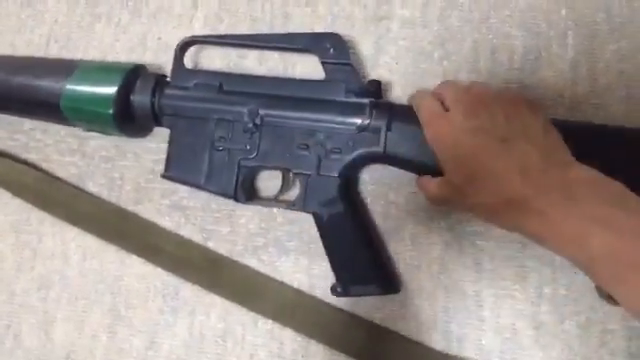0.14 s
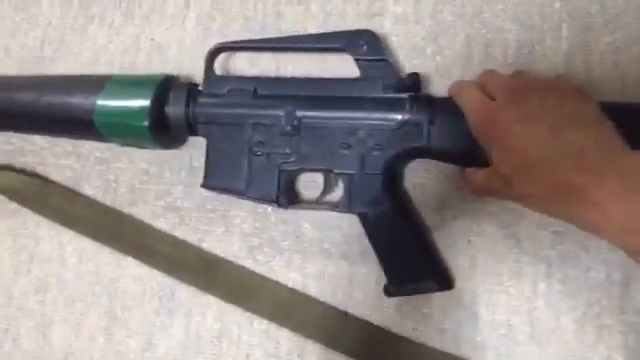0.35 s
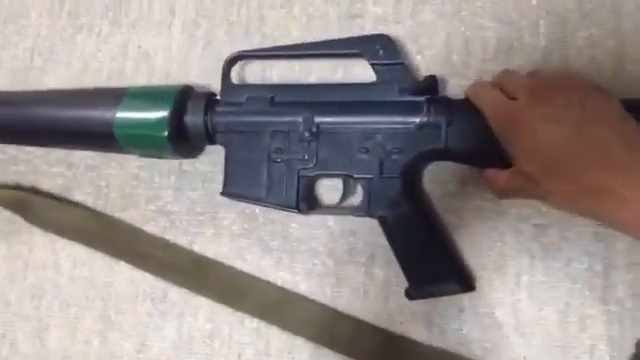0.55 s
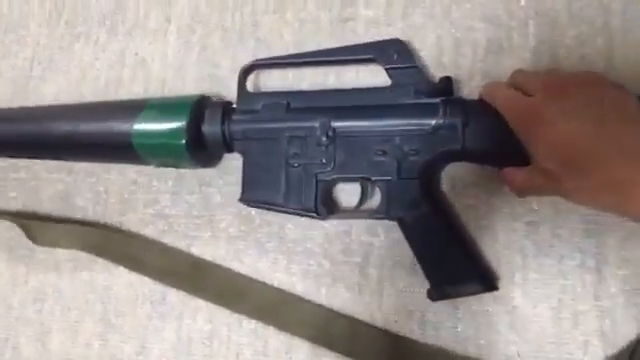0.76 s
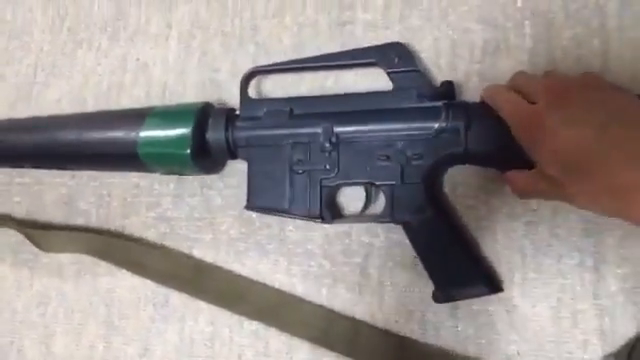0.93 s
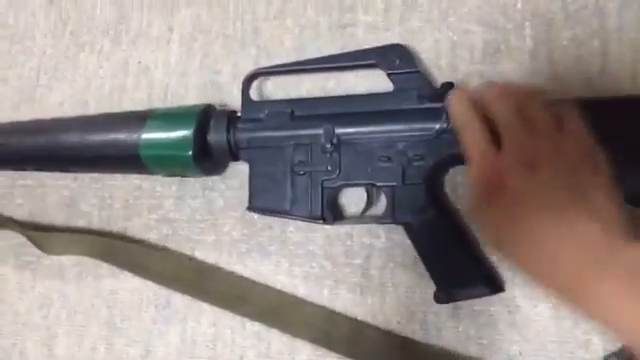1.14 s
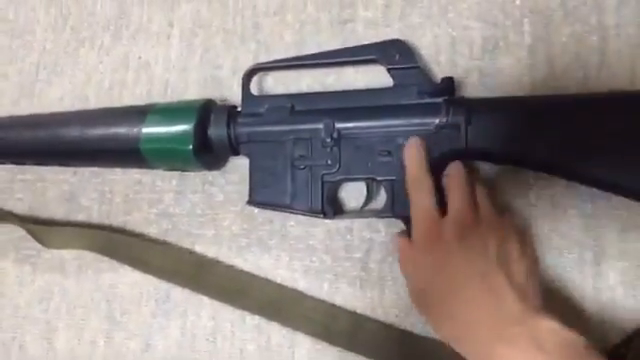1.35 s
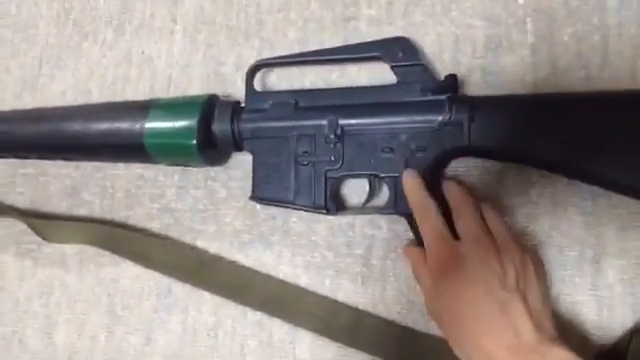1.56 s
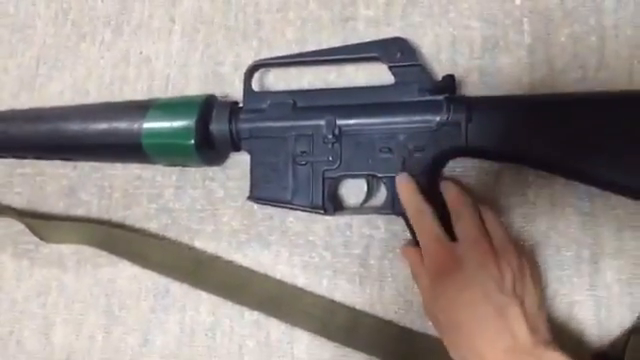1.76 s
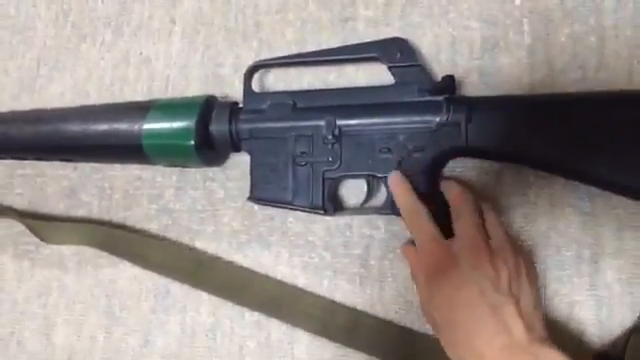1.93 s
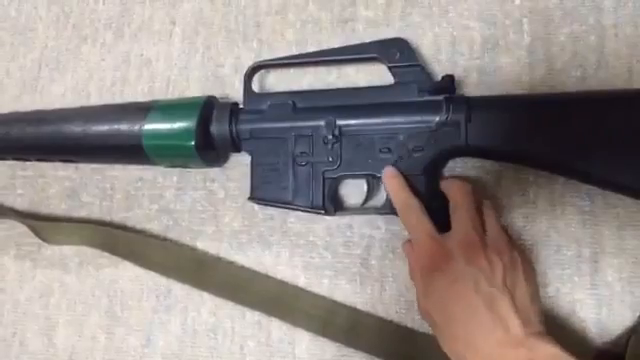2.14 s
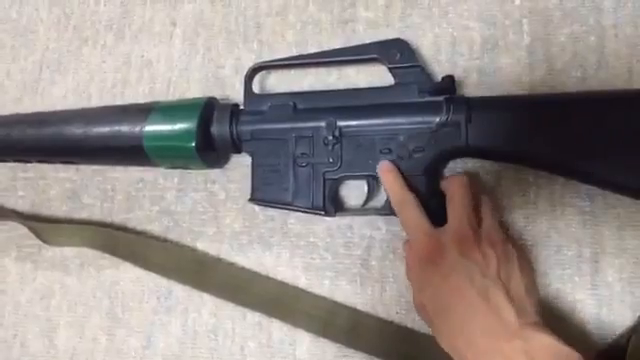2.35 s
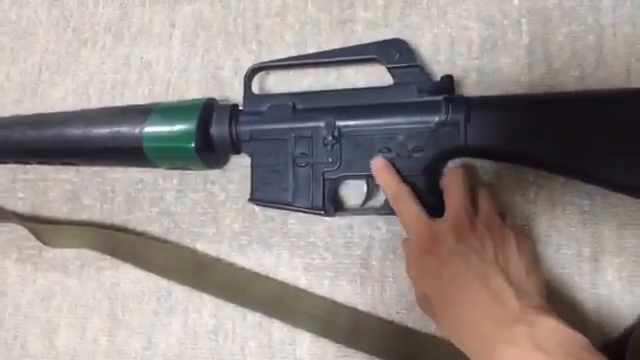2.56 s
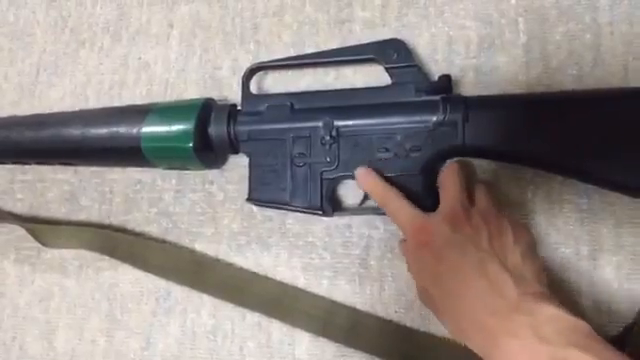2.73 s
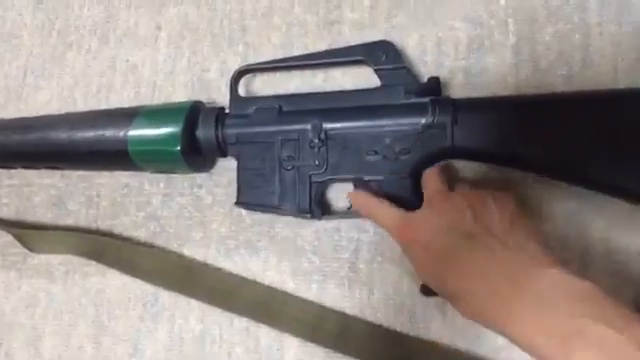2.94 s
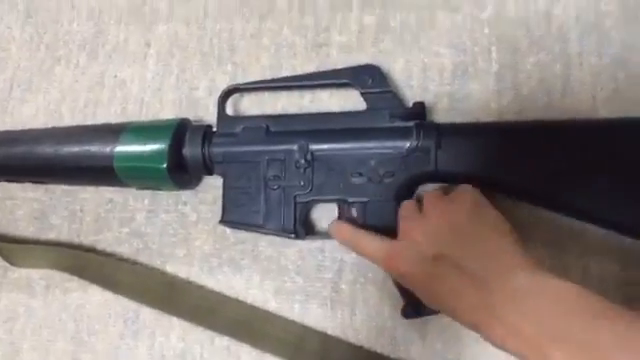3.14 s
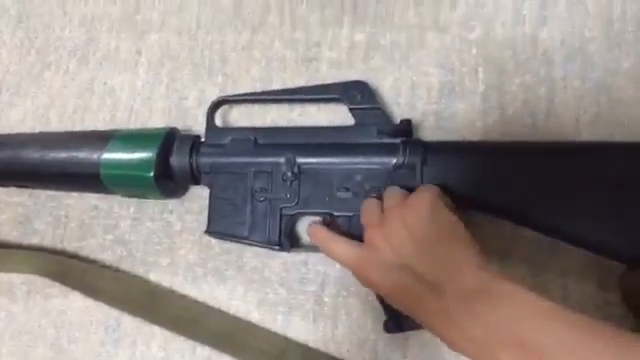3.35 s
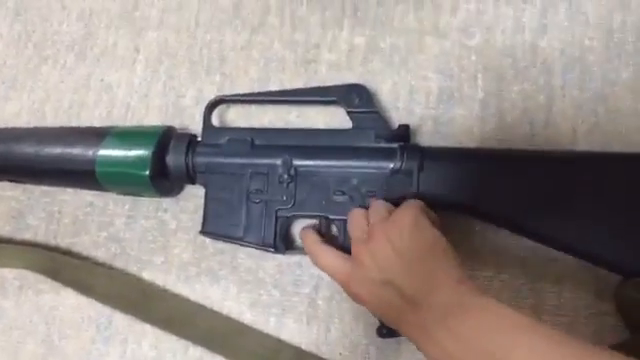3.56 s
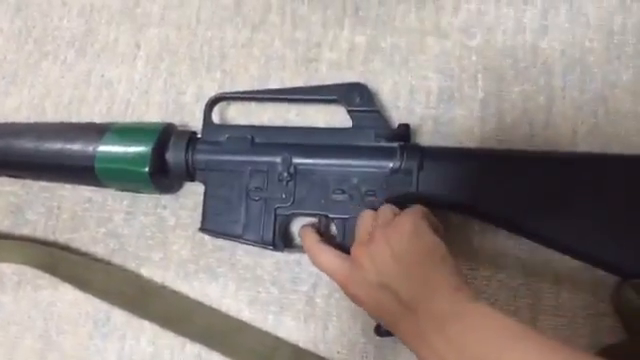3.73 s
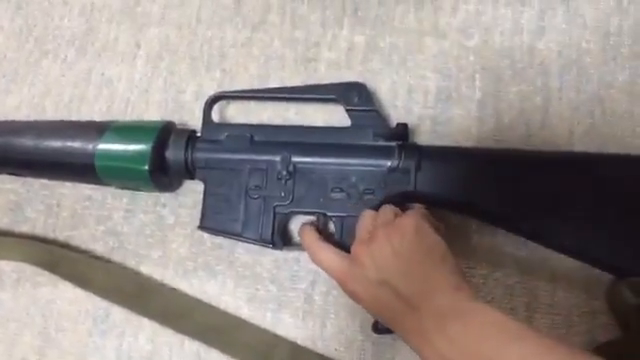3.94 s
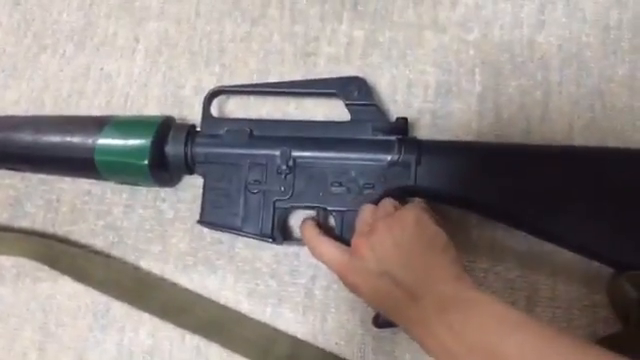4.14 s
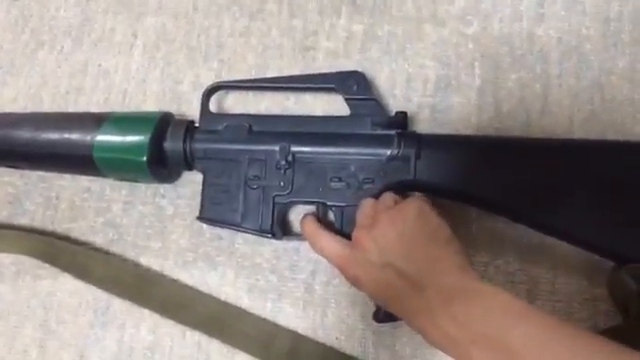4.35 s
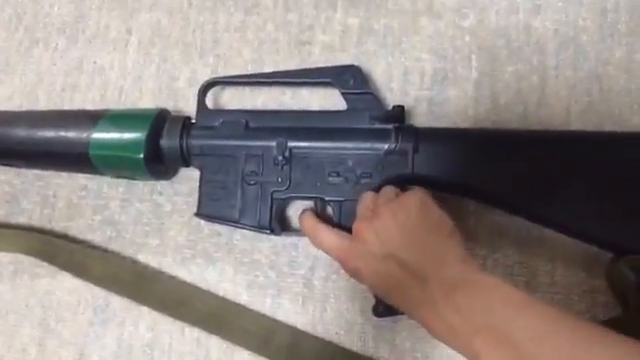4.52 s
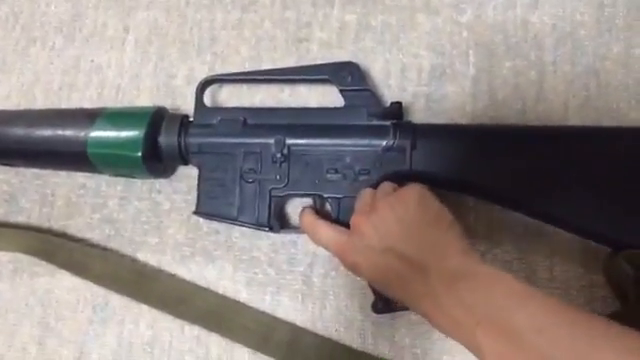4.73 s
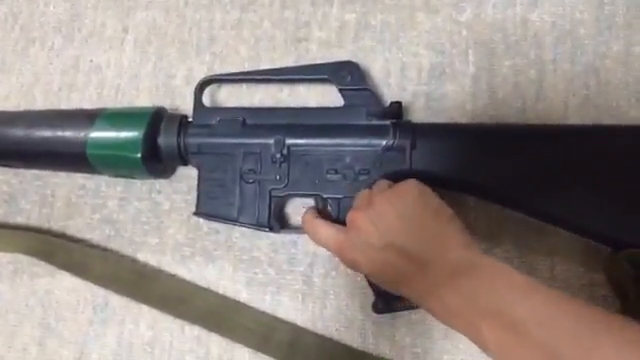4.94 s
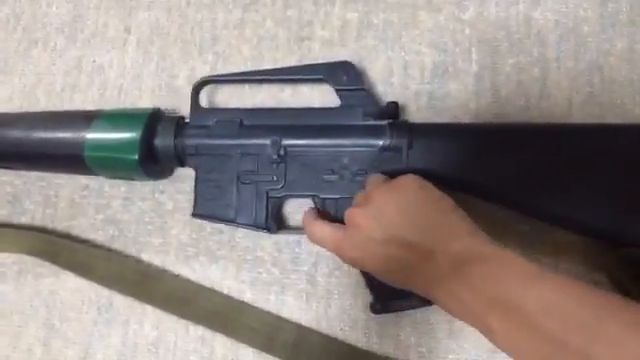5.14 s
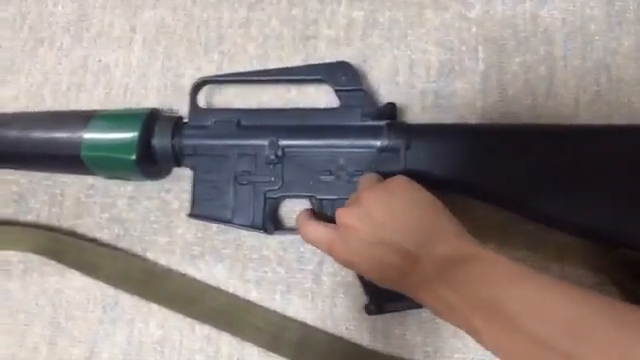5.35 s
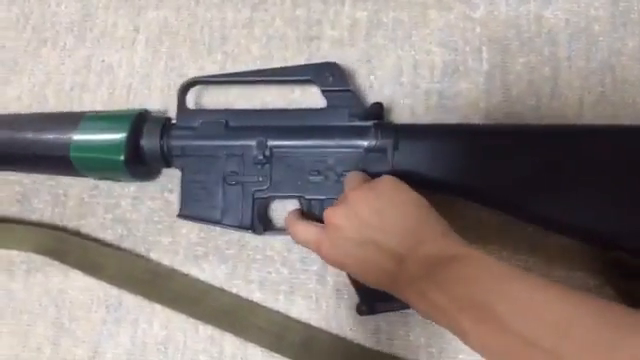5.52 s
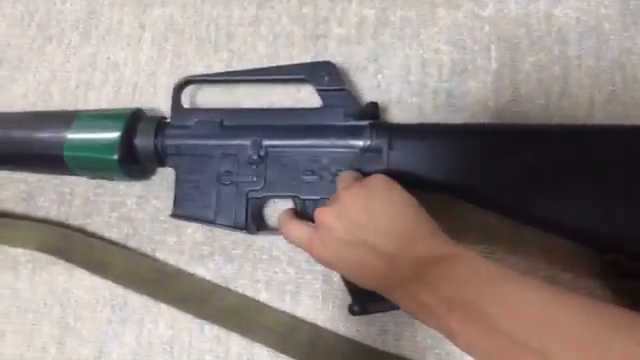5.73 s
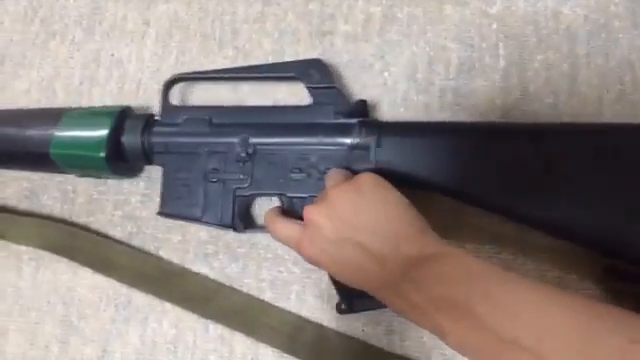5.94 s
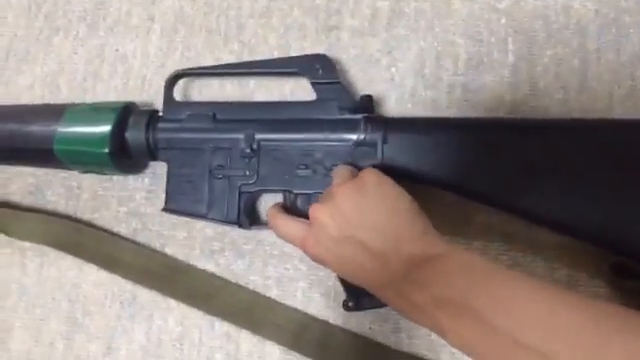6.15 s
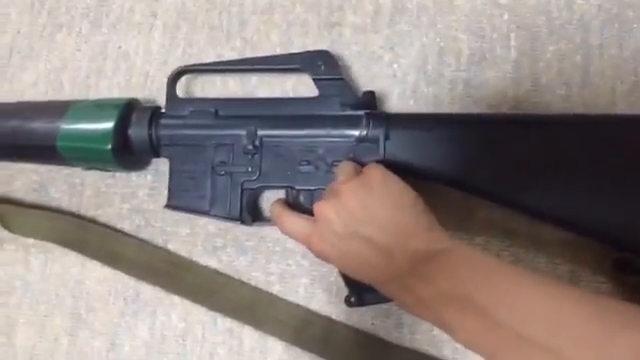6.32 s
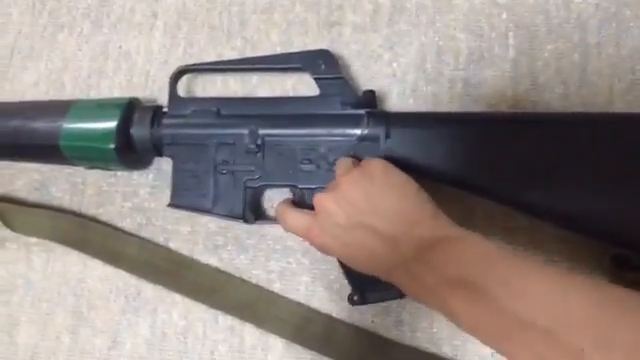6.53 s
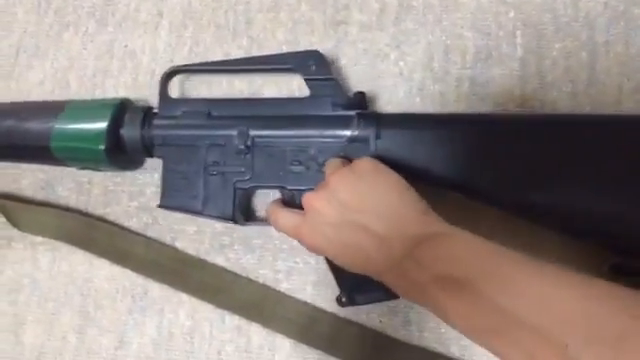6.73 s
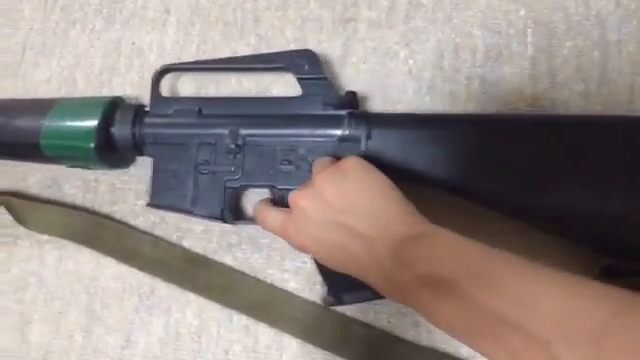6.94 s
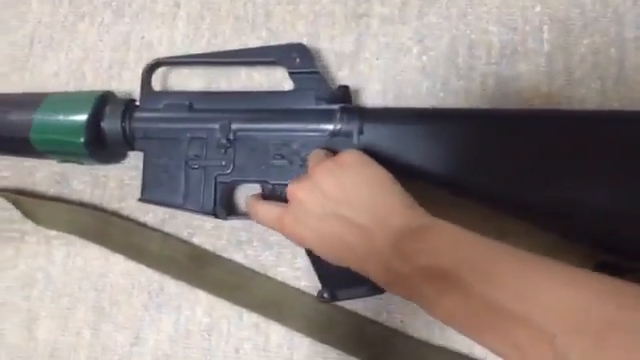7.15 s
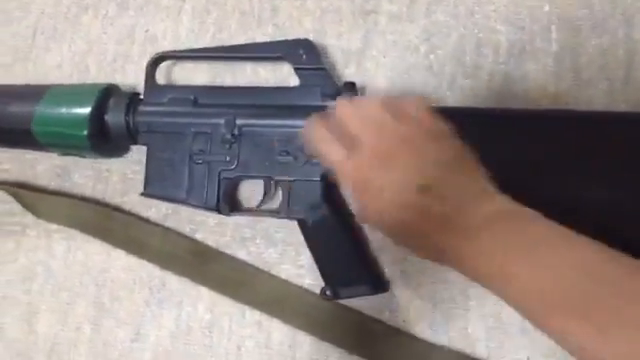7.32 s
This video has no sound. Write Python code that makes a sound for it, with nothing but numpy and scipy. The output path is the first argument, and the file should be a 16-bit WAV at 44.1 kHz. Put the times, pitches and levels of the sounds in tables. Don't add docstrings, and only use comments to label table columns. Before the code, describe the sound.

Soft carpet rustle and small plastic ticks, one sharp click, a long pause, then a whining electric toy gun hammers through two rapid bursts.

```python
import sys
import numpy as np
from scipy import signal
from scipy.fft import rfft, irfft
from scipy.io import wavfile
from scipy.ndimage import uniform_filter1d

SR = 44100
rng = np.random.default_rng(int(sys.argv[2]) if len(sys.argv) > 2 else 0)


def inscribe(sig):
    pcm = np.round(np.clip(np.atleast_2d(sig).T, -1, 1) * 32767)
    wavfile.write(sys.argv[1], SR, pcm.astype(np.int16))


def magnitude_from_level(level_db):
    exponent = np.asarray(level_db, float) / 20
    return 10 ** exponent


N = 329868
TIME = np.arange(N) / SR

# f/Hz, level/dB per Hz
HUSH_SPECTRUM = [(12, -63.5), (20, -8), (48, -3.5), (72, -1.5), (276, -13.5), (323, -11.5), (480, -19),
                 (576, -15), (730, -19.5), (1410, -22), (3090, -28.5), (7960, -31), (10600, -34),
                 (13800, -54), (22000, -120)]
HUSH_DB = -65
# f/Hz, level/dB
HUM_TONES = [(538.3, -84), (586.8, -74)]
ROOM_T60_S, ROOM_DB = 0.19, -12.5

# t/s, speed level/dB, weight level/dB
DRAG_MOTION = [
    [(.07, -72.5, -90), (.164, -59, -60), (.306, -54, -39.5), (.464, -56.5, -47), (.5, -59, -55),
     (.628, -61, -57.5), (.7, -58.5, -51.5), (.814, -59.5, -58), (1.008, -82.5, -77)],
]
# t/s, length/s, shell level/dB, pile level/dB, floor level/dB
GRIP_SHIFTS = [(.01, 0.11, -65.5, -74, -56), (1.042, 0.11, -60, -74, -60.5),
               (1.288, 0.032, -64.5, -77, -60), (1.37, 0.28, -69.5, -71, -75), (1.522, 0.13, -73, -73, -70),
               (1.68, 0.063, -86, -85, -62), (2.658, .25, -82, -83, -63), (2.88, 0.33, -74, -85, -73),
               (3.256, .18, -73, -79, -79), (3.423, 0.065, -88, -86, -63), (6.265, .5, -70.5, -87, -91),
               (6.37, .6, -69, -78.5, -89), (6.527, 0.19, -66, -74, -75)]
SHIFT_RISE_S, SHIFT_SWING_DB = 0.064, 20.5
# f/Hz, level/dB per Hz
RUSTLE_SPECTRUM = [(180, -35.5), (300, -9), (550, -12), (680, -0.5), (1030, -4), (1240, 0), (3000, -11.5),
                   (3900, -45), (6600, -120)]
# f/Hz, level/dB per Hz
PILE_SPECTRUM = [(1760, -18.5), (3000, -3), (4210, -3.5), (4810, 0), (5690, -3), (9510, -6.5), (10600, -16),
                 (13800, -44), (22000, -120)]
PILE_BELOW_DB = 3.5
# f/Hz, level/dB per Hz
RUMBLE_SPECTRUM = [(12, -50), (20, -36.5), (65, 1.5), (102, -9), (172, -9.5), (274, -44), (300, -55.5),
                   (390, -64), (660, -120)]

PART_VOICES = {"shell": [(1250, 1300, 0.018, 2)], "creak": [(1250, 1300, 0.24, -4)],
               "butt": [(210, 210, 0.058, 6.5)], "grip": [(460, 610, 0.062, -0.5)],
               "nail": [(6600, 2800, 0.011, 2)], "seam": [(3000, 3000, .02, -0.5)],
               "detent out": [(6510, 3700, 0.011, 1), (2150, 630, .03, -25.5), (450, 400, .02, -36),
               (5500, 1200, 0.041, -16)], "detent in": [(5100, 2300, 0.011, -5), (3300, 1400, 0.024, -7.5),
               (8470, 3200, 0.013, -7.5), (2150, 1100, 0.013, -11.5), (5000, 7000, 0.12, -14.5)],
               "trigger": [(1337, 700, .035, -1), (2600, 1600, .04, -5.5)],
               "contact": [(5010, 11000, 0.0076, 2)], "pinion": [(3700, 250, 0.043, 0.5)],
               "latch": [(4890, 230, 0.032, -0.5)], "floor": [(60.3, 63, 0.088, -3.5)],
               "scrape": [(5140, 800, .12, 0)], "rub": [(1350, 180, 0.36, 1)],
               "squeak": [(1860, 600, .18, 0)], "brush": [(2610, 700, 0.019, -0.5)],
               "stock": [(750, 1240, 0.028, 0.5)]}
FINGER_TICKS = {"shell": [(.981, -52.5), (1.018, -49), (1.114, -48), (3.394, -55), (4.931, -53),
                (7.425, -49)], "creak": [(1.026, -48), (1.105, -47)], "rub": [(.03, -54)],
                "squeak": [(3.24, -59)], "butt": [(.045, -50.5), (3.17, -60), (3.41, -63)],
                "stock": [(1.043, -39.5)], "grip": [(1.087, -46.5), (3.395, -50), (3.45, -63)],
                "seam": [(1.045, -45), (1.122, -58), (1.274, -54), (1.4195, -54), (2.987, -61),
                (6.561, -52.5)], "nail": [(1.034, -54), (1.046, -48), (1.261, -56), (1.335, -53),
                (1.42, -63), (6.529, -70), (7.425, -55)], "scrape": [(1.095, -58), (1.125, -60)]}
WORKS_TICKS = {"nail": [(2.394, -52)], "detent out": [(2.4052, -19)], "detent in": [(2.4228, -27)],
               "trigger": [(4.9865, -37)], "shell": [(5.075, -24.5)], "grip": [(6.584, -25.5)],
               "butt": [(6.584, -26.5)], "contact": [(5.0788, -28), (6.571, -38.5), (6.5832, -15.5)],
               "pinion": [(5.092, -14.5), (5.117, -17), (6.5834, -17)], "brush": [(6.583, -13.5)],
               "latch": [(5.1105, -9.5)], "floor": [(6.024, -18)]}

# first slam t/s, cycle/s, number of shots
STEADY_FIRE = [
    (5.2582, .05878, 13),
    (6.7400, .05905, 8),
]
KNOCK_LAG_S, SNAP_LAG_S = .0172, .0273
# slam t/s, knock lag/s, snap lag/s, slam level/dB, knock level/dB (0 is steady fire)
SPIN_UP_CYCLES = [
    (5.1287, .0205, .0342, 1.5, -6),
    (5.194, 0.019, .0324, 0.5, 1.5),
    (6.607, 0.013, 0.032, 1, -1.5),
    (6.671, .024, .0377, -11, 0.5),
]
# slam t/s, snap lag/s, slam level/dB, snap level/dB
COAST_CYCLES = [
    (6.025, .0326, -6.5, -1.5),
    (7.214, .0294, -0.5, -5),
]
# t/s, level/dB (0 is steady fire)
BOUNCES = [
    (5.1736, 2.5),
    (6.0709, -6),
]

# t/s, load level/dB, tooth rate f/Hz
MOTOR_RUNS = [
    [(5.076, -66.5, 2237), (5.08, -25.5, 2302), (5.108, -15, 3270), (5.13, -20.5, 3780), (5.175, -17, 3632),
     (5.3, -17, 3300), (6.02, -17.5, 3238), (6.078, -23, 2600), (6.09, -66, 2500)],
    [(6.5815, -34.5, 2500), (6.585, -23, 2718), (6.6, -25.5, 3000), (6.65, -16.5, 3070),
     (6.75, -17.5, 3190), (7.22, -18, 3178), (7.258, -20, 2674), (7.27, -67, 2520)],
]
# share of cycle, grind level/dB, whine level/dB
CYCLE_LOAD = [(0, 5.5, -16), (.2, -0.5, -15), (0.301, 3, 3), (0.501, 2, -14), (0.702, 0, -5),
              (.88, 0.5, -1.5), (0.962, -7.5, 2.5), (0.998, -7, -19.5)]
# f/Hz, level/dB per Hz
GRIND_SPECTRUM = [(280, -33.5), (480, -11.5), (700, -8), (1160, -7), (1850, -8), (2700, -9.5), (3300, -9.5),
                  (4400, -13), (7000, -11), (10600, -20.5)]
WHINE_DB, FREE_RUN_DB = -10, 13.5
BITE_S, SETTLE_S = 0.053, 0.02

# f/Hz, level/dB, t60/s
RECEIVER_MODES = [(354.6, 0.5, 0.013), (700, 1.5, 0.017), (857, 9, 0.014), (1070, 3, 0.02),
                  (1300, 1, 0.029), (1800, -10, 0.035), (2080, -5.5, 0.035)]
# f/Hz, level/dB, t60/s
THUMP_MODES = [(58.4, -7, 0.26), (115, -2.5, 0.042), (257, -7, 0.011)]
# f/Hz, level/dB, t60/s
LATCH_MODES = [(1084, -2.5, 0.035), (1321, 2, 0.014), (1834, -8, 0.089), (2100, -5, 0.024),
               (2430, 6.5, 0.0097), (3300, -20.5, 0.0092), (7400, -14.5, 0.036)]
# f/Hz, level/dB per Hz
CRACK_SPECTRUM = [(880, -17), (1500, -5.5), (1950, 3.5), (2890, -2.5), (3980, -4.5), (7170, 1),
                  (10600, -12.5), (13800, -48), (22000, -120)]
# f/Hz, level/dB per Hz
JOLT_SPECTRUM = [(21, -38.5), (35, -1), (135, -4), (177, 0.5), (263, -3.5), (480, -7), (620, -27.5),
                 (1060, -120)]
BODY_DB, CRACK_DB, THUMP_DB, KNOCK_DB, SNAP_DB, LATCH_DB = -1.96, -13.5, -27, -8, -4.5, -11.5
UNEVEN_DB = 1.2
ROCK_S, ROCK_WIDTH_S, ROCK_DB = 5.755, .06, 7

# f/Hz, level/dB, t60/s
STOCK_MODES = [(187, -10, .09), (340, -17, .06), (765, -15, .04), (1003, -14, .045), (1300, -10, .02),
               (1843, -3, .025), (2450, -10, .018)]
# f/Hz, level/dB, t60/s
TUBE_MODES = [(695, 0, .085)]
REBOUND_CYCLES, REBOUND_SHARE = 4, .24

# start t/s, end t/s, level/dB
SPRING_SONGS = [
    (6.128, 6.563, -52.5),
    (7.332, 7.48, -65.5),
]
# f/Hz, level/dB
SPRING_HIGH_TONES = [(8091, -101), (8328, -96), (8468, -86)]
SPRING_HZ, SPRING_FADE_DB_S, SPRING_RISE_S = 1063, 19, .015
BEAT_HZ, BEAT_DB = 3.8, 2.5


def rms_one(x):
    return x / np.sqrt(np.mean(x ** 2) + 1e-20)


def coloured(spectrum, white=None):
    if white is None:
        white = rng.standard_normal(N)
    hz, level_db = np.transpose(spectrum)
    bin_hz = np.arange(N // 2 + 1) * SR / N
    read_hz = np.minimum(bin_hz + 1, 10400)
    shape = magnitude_from_level(np.interp(np.log(read_hz), np.log(hz), level_db)) * (bin_hz < 12000)
    return rms_one(irfft(rfft(white) * shape, N))


def drift(rate_hz):
    r = np.exp(-2 * np.pi * rate_hz / SR)
    wander = signal.lfilter([1], [1, -2 * r, r * r], rng.standard_normal(N + SR))
    return rms_one(wander[SR:])


def grains(per_s, size_db):
    sizes = magnitude_from_level(size_db * np.minimum(rng.exponential(1, N), 5)) * rng.choice([-1, 1], N)
    return sizes * (rng.random(N) < per_s / SR)


def in_time(spans):
    s, *columns = np.transpose(np.concatenate(spans))
    on = sum((TIME >= rows[0][0]) & (TIME <= rows[-1][0] + .025) for rows in spans)
    return [np.interp(TIME, s, c) for c in columns] + [uniform_filter1d(1. * on, size=40)]


def strikes(times, level_db):
    clicks = np.full(N, 1e-18)
    clicks[(np.asarray(times) * SR).astype(int)] = magnitude_from_level(level_db)
    return clicks


def struck(times, level_db, modes, spread_db, contact_hz):
    out = 0
    luck = rng.standard_normal((len(times), len(modes)))
    for k, (hz, mode_db, t60) in enumerate(modes):
        r, w = magnitude_from_level(-60 / (t60 * SR)), 2 * np.pi * hz / SR
        clicks = (-1) ** k * strikes(times, level_db + mode_db + spread_db * luck[:, k])
        out = out + signal.lfilter([0, np.sin(w)], [1, -2 * r * np.cos(w), r * r], clicks)
    return signal.lfilter(*signal.butter(1, contact_hz, fs=SR), out)


def dying(times, level_db, t60):
    return signal.lfilter([1], [1, -magnitude_from_level(-60 / (t60 * SR))], strikes(times, level_db))


def background():
    hum = 0
    for hz, db in HUM_TONES:
        hum = hum + magnitude_from_level(db + 1.5 + 1.6 * drift(14)) * np.sqrt(2) * np.sin(2 * np.pi * hz * TIME)
    return magnitude_from_level(HUSH_DB - 1.34 + 0.64 * drift(11)) * coloured(HUSH_SPECTRUM) + hum


def drag():
    speed_db, weight_db, on = in_time(DRAG_MOTION)
    gains = on * magnitude_from_level(np.array([speed_db, speed_db - PILE_BELOW_DB, weight_db]))
    for s, length, *peaks_db in GRIP_SHIFTS:
        away = np.maximum((s - TIME) / SHIFT_RISE_S, (TIME - s) / length)
        swell = magnitude_from_level(-SHIFT_SWING_DB * np.minimum(away, 10))
        gains = gains + np.outer(magnitude_from_level(np.array(peaks_db)), swell)
    shell = magnitude_from_level(-1.5 + 2.1 * drift(22)) * coloured(RUSTLE_SPECTRUM, grains(3000, size_db=-0.5))
    pile = magnitude_from_level(-2.2 + 1.2 * drift(25)) * coloured(PILE_SPECTRUM, grains(7200, size_db=0.5))
    rumble = magnitude_from_level(2.8 * drift(22)) * coloured(RUMBLE_SPECTRUM)
    return gains[0] * shell + gains[1] * pile + gains[2] * rumble


def tick(hz, width_hz, t60):
    t = np.arange(8000) / SR
    r = np.exp(-np.pi * width_hz / SR)
    burst = rng.standard_normal(8000) * magnitude_from_level(-60 * t / t60) * np.minimum(t / (0.04 * t60), 1)
    resonance = [0.87, 0.011, -1, 1, -2 * r * np.cos(2 * np.pi * hz / SR), r * r]
    ring = signal.sosfilt([resonance] * 2, burst)
    return ring / np.abs(ring).max()


def ticks():
    out = np.zeros(N)
    for touches in (FINGER_TICKS, WORKS_TICKS):
        for part, events in touches.items():
            for s, db in events:
                at = int(s * SR)
                for hz, width_hz, t60, part_db in PART_VOICES[part]:
                    out[at:at + 8000] += (magnitude_from_level(db + part_db) * tick(hz, width_hz, t60))[:N - at]
    return out


def room(x):
    t = np.arange(SR // 2) / SR
    low = signal.lfilter(*signal.butter(1, 2500, fs=SR), rng.standard_normal(len(t)))
    tail = rng.standard_normal(len(t)) * magnitude_from_level(-60 * t / (1.08 * ROOM_T60_S))
    tail = tail + 0.24 * low * magnitude_from_level(-60 * t / (1.8 * ROOM_T60_S))
    tail = tail * (t > .004)
    x = signal.lfilter(*signal.butter(2, 160, "high", fs=SR), x)
    return magnitude_from_level(ROOM_DB) * signal.fftconvolve(x, tail / np.sqrt(np.sum(tail ** 2)))[:N]


def contacts():
    cycles = [(first + k * cycle, KNOCK_LAG_S, SNAP_LAG_S, 0, 0)
              for first, cycle, shots in STEADY_FIRE for k in range(shots)] + SPIN_UP_CYCLES
    slams, hits, snaps = [], [], list(BOUNCES)
    for s, knock_lag, snap_lag, slam_db, knock_db in cycles:
        slams.append((s, slam_db))
        hits.append((s + knock_lag, knock_db))
        snaps.append((s + snap_lag, 0))
    for s, snap_lag, slam_db, snap_db in COAST_CYCLES:
        slams.append((s, slam_db))
        snaps.append((s + snap_lag, snap_db))
    return [np.transpose(sorted(rows)) for rows in (slams, hits, snaps)]


def gearbox():
    load_db, mesh_hz, on = in_time(MOTOR_RUNS)
    slams = contacts()[0][0]
    free = 0
    for rows in MOTOR_RUNS:
        start = rows[0][0]
        hit = slams[np.searchsorted(slams, start)]
        free = free + np.interp(TIME, [start, start + BITE_S, hit, hit + SETTLE_S], [0, 1, 1, 0])
    cycle = np.interp(TIME, slams, np.arange(len(slams))) % 1
    gap = np.diff(slams, append=N)[np.searchsorted(slams, TIME) - 1]
    firing = (TIME > slams[0]) & (gap < .1)
    share, stroke_grind_db, stroke_whine_db = np.transpose(CYCLE_LOAD)
    grind_db = load_db + firing * np.interp(cycle, share, stroke_grind_db) + .8 * drift(120)
    grind = coloured(GRIND_SPECTRUM, grains(6000, size_db=1.5)) * magnitude_from_level(grind_db)
    turn = 2 * np.pi * np.cumsum(mesh_hz * (1 + .036 * drift(110))) / SR
    whine = np.sin(turn) + magnitude_from_level(-1) * np.sin(turn / 2 + 1.5 * drift(40)) + magnitude_from_level(-15) * np.sin(2 * turn)
    whine_db = load_db + WHINE_DB + FREE_RUN_DB * free
    whine_db = whine_db + firing * np.interp(cycle, share, stroke_whine_db) + 2.5 * drift(110)
    return on * (grind + whine * magnitude_from_level(whine_db))


def blows():
    (slam, slam_db), (knock, knock_db), (snap, snap_db) = contacts()
    crack_db = CRACK_DB + UNEVEN_DB * rng.standard_normal(len(slam))
    clack_db = SNAP_DB + snap_db + UNEVEN_DB * rng.standard_normal(len(snap))
    weight_db = KNOCK_DB + knock_db
    thump_db = THUMP_DB + 0.43 * slam_db + 2 * UNEVEN_DB * rng.standard_normal(len(slam))
    thump_db = thump_db + ROCK_DB * np.exp(-((slam - ROCK_S) / ROCK_WIDTH_S) ** 2)
    puff = np.hanning(28)
    pop = -np.convolve(strikes(slam + .0011, BODY_DB + .4 * slam_db - 1.5), puff)[:N]
    rings = struck(slam + 0.00124, BODY_DB + slam_db - 11, RECEIVER_MODES, spread_db=2.0, contact_hz=3000)
    rings += struck(slam + 0.0017, thump_db + 5, THUMP_MODES, spread_db=3.0, contact_hz=700)
    rings += struck(snap + 0.00062, LATCH_DB + snap_db - 5, LATCH_MODES, spread_db=2.5, contact_hz=12000)
    rattle = dying(slam + .0009, crack_db + 2, .018) + dying(slam + .0052, crack_db - 4, .03)
    rattle += dying(snap + .0005, clack_db - 5.5, .018) + dying(snap + .0045, clack_db - 10, .02)
    rattle += dying(knock - .003, weight_db - 17, 0.014)
    jolt = dying(slam + 0.0011, thump_db + 1, .1) + dying(knock, weight_db - 22, .07)
    jolt = uniform_filter1d(jolt, size=130)
    return pop + rings + rattle * coloured(CRACK_SPECTRUM) + jolt * coloured(JOLT_SPECTRUM)


def knocks():
    s, knock_db = contacts()[1]
    level_db = KNOCK_DB + knock_db
    boom = struck(s + .0006, level_db + .8, TUBE_MODES, spread_db=.5, contact_hz=2500)
    boom -= REBOUND_SHARE * np.roll(boom, round(REBOUND_CYCLES * SR / TUBE_MODES[0][0]))
    shell = struck(s + .0008, level_db + .3, STOCK_MODES, spread_db=1.1, contact_hz=3500)
    return boom + shell


def ducking(loud, depth_db, release_db_s):
    held_db = depth_db * (uniform_filter1d(loud ** 2, size=400) > magnitude_from_level(-60))
    climb_db = release_db_s * TIME
    sunk_db = np.maximum.accumulate(held_db + climb_db) - climb_db
    return magnitude_from_level(-np.maximum(sunk_db, 0))


def spring():
    line = 0
    for start, end, db in SPRING_SONGS:
        t = TIME - start
        gate = np.clip(np.minimum(t, end + 0.023 - TIME) / SPRING_RISE_S + 1, 0, 1)
        beat_db = BEAT_DB * np.cos(2 * np.pi * BEAT_HZ * t)
        line = line + gate * magnitude_from_level(db - SPRING_FADE_DB_S * np.maximum(t, 0) + beat_db)
    high = sum(magnitude_from_level(db) * np.sin(2 * np.pi * hz * TIME) for hz, db in SPRING_HIGH_TONES)
    fade = dying([6.1, 7.27], np.array([9, 3]), 2.1)
    return np.sqrt(2) * (line * np.sin(2 * np.pi * SPRING_HZ * TIME) + (line > 0) * fade * high)


def scene():
    fingers = ticks()
    rifle = gearbox() + blows() + knocks()
    close = drag() + fingers + rifle + room(rifle + magnitude_from_level(-5) * fingers) + spring()
    return (close + background() * ducking(rifle, depth_db=12, release_db_s=30))[None]


def top_cut(x):
    return signal.sosfilt(signal.butter(12, 10780, fs=SR, output="sos"), x)


def record(dry):
    heard = signal.sosfilt(signal.butter(2, 42, "high", fs=SR, output="sos"), dry)
    limited = heard / (1 + (np.abs(heard) / .96) ** 5) ** (1 / 5)
    cut = signal.sosfilt(signal.ellip(10, .5, 62, 10680, fs=SR, output="sos"), limited)
    return top_cut(cut)


dry = scene()
out = record(dry)
inscribe(out)
```